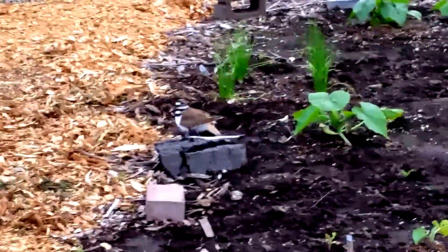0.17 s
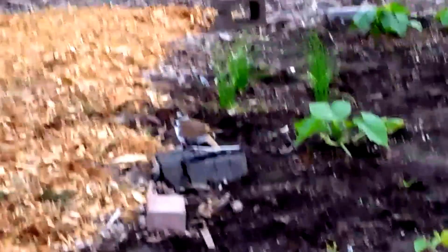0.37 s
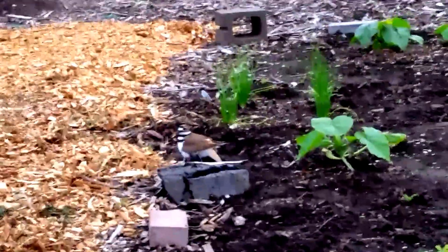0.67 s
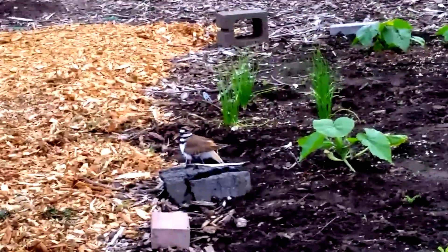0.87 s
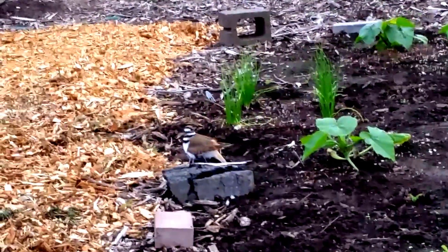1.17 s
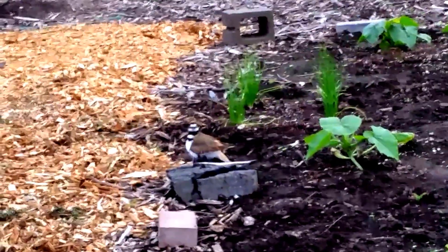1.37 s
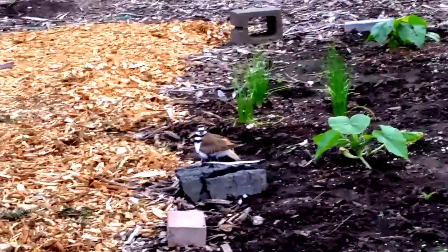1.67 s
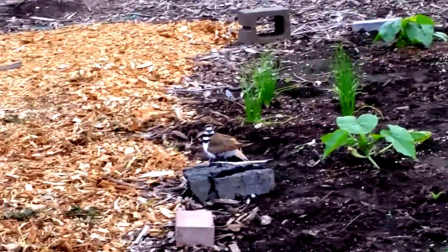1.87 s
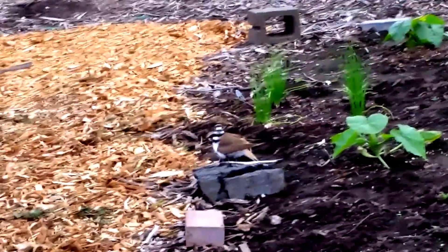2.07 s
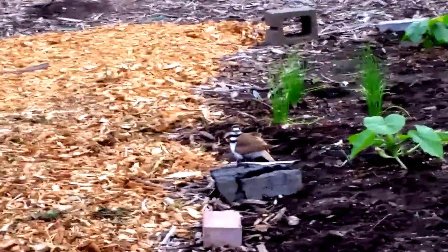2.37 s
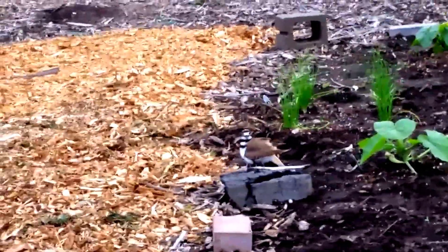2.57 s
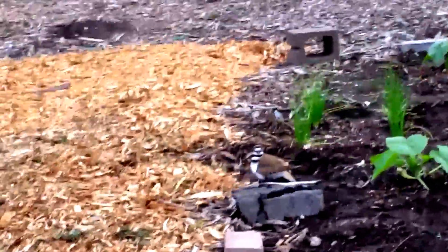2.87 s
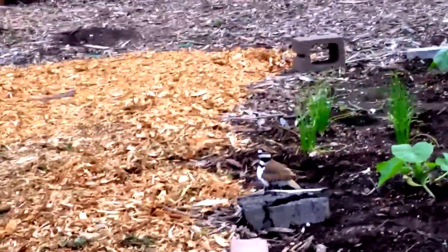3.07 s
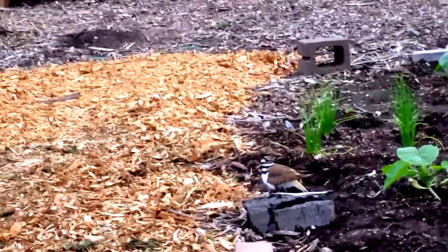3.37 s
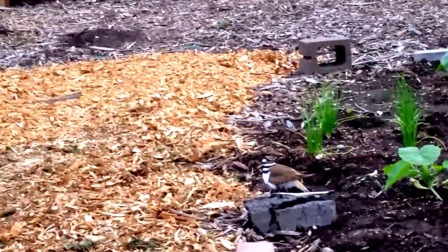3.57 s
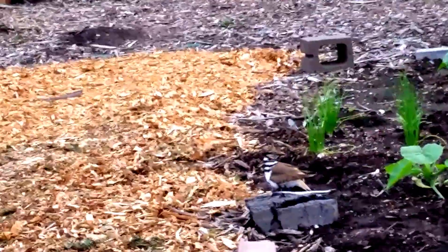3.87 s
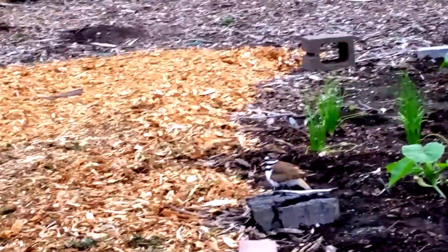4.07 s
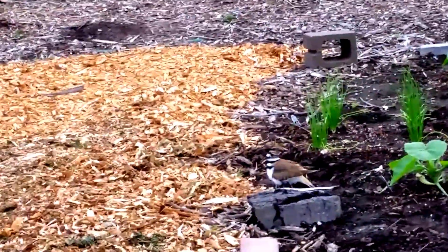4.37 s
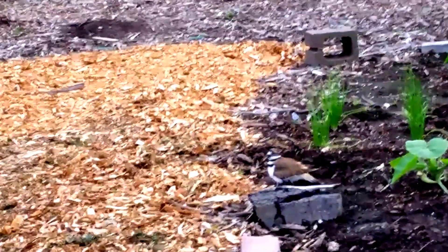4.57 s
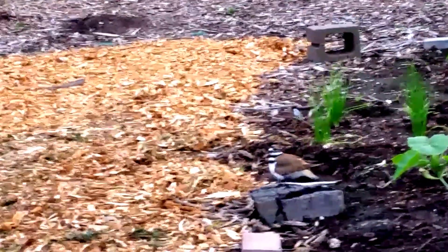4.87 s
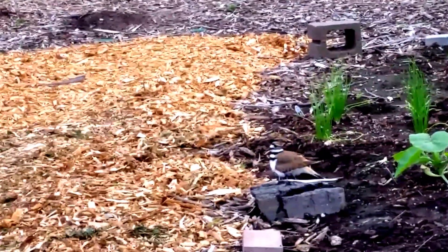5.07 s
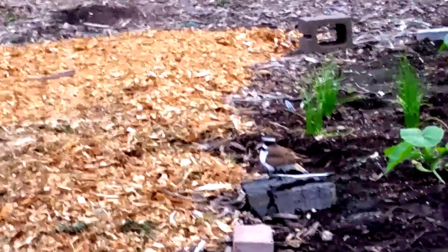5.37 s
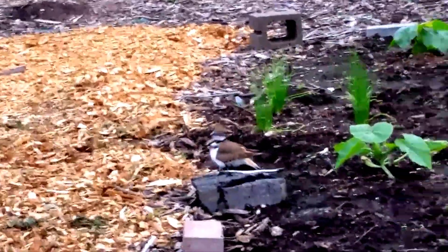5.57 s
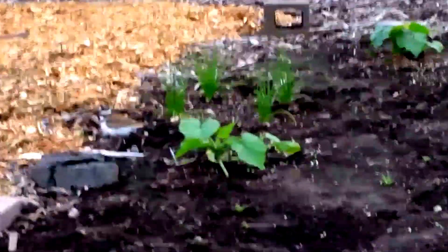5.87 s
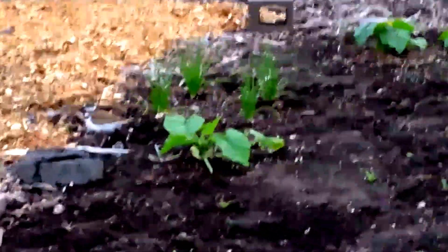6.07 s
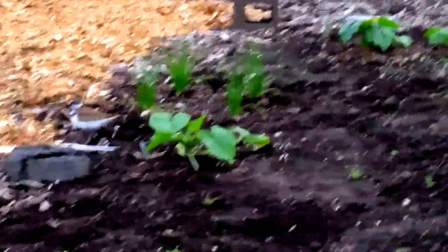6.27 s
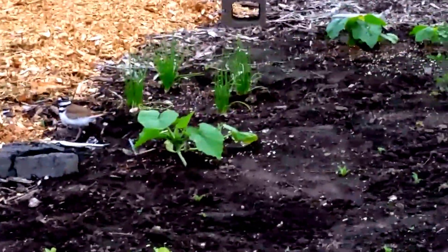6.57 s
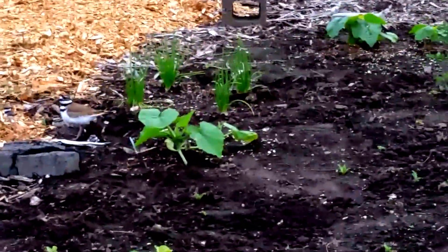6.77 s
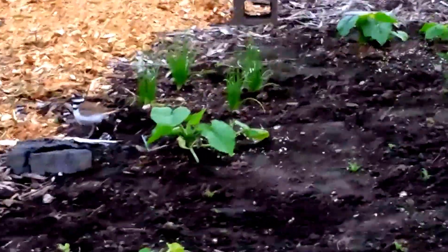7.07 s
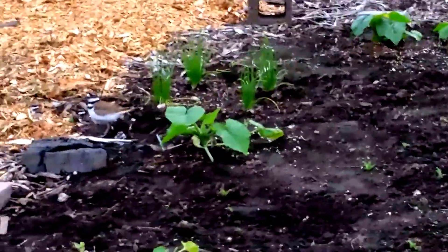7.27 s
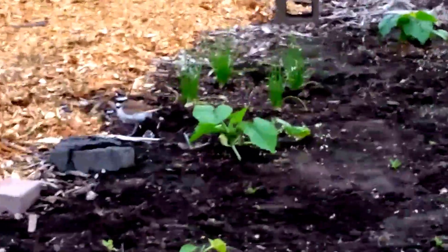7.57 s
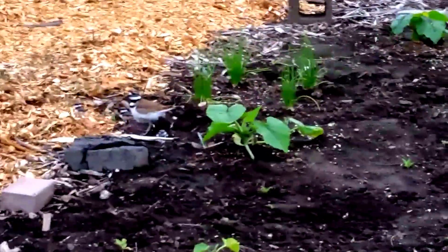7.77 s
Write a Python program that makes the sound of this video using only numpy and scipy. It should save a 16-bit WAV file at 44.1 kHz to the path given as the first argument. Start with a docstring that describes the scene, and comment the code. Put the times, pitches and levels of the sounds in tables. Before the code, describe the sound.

Thin sharp bird peeps repeat over a quiet low outdoor rumble and faint hiss, while fingers thump and rub the microphone case.

```python
"""Killdeer in a garden bed

A killdeer peeps about once a second, a few metres from a hand-held phone: gliding sine partials.
Small birds whistle, chirp and chip further off: sines with decaying noise tails.
Fingers knock (damped pushes into case resonances) and rub (gated noise) on the case, most while it turns.
Under it lie a low outdoor rumble and the left microphone's hiss near 4 kHz: coloured noise."""
import sys
import numpy as np
from scipy import signal
from scipy.fft import rfft, irfft, next_fast_len
from scipy.io import wavfile
from scipy.ndimage import uniform_filter1d

SR = 44100
rng = np.random.default_rng(int(sys.argv[2]) if len(sys.argv) > 2 else 0)


def wav_out(sig):
    """Save sig, one row per channel (or a flat mono array), as 16-bit PCM at SR to the path in sys.argv[1]."""
    wavfile.write(sys.argv[1], SR, np.round(np.clip(np.atleast_2d(sig).T, -1, 1) * 32767).astype(np.int16))


N = 349552
TIME_S = np.arange(N) / SR
FFT_SIZE = next_fast_len(N)
FREQS_HZ = np.maximum(np.arange(FFT_SIZE // 2 + 1) * SR / FFT_SIZE, 1)  # no zero: logs are taken


def undb(db):
    """Decibels to gain."""
    return 10 ** (np.asarray(db) / 20)


def unit(x):
    """Scale to rms 1."""
    return x / np.sqrt(np.mean(x ** 2))


def curves(rows, at):
    """Interpolate every later column of a table along its first."""
    first, *columns = np.transpose(rows)
    return [np.interp(at, np.sort(first), column) for column in columns]


def pan(lr_db):
    """Left and right gains for a level difference, split evenly."""
    return undb(np.array([[.5], [-.5]]) * lr_db)


def add(out, start_s, sound):
    """Mix a sound in at a time."""
    start = int(start_s * SR)
    out[:, start:start + sound.shape[-1]] += sound[..., :N - start]


def fades(t, length_s, rise_s, fall_s):
    """Smooth gate from 0 to length_s."""
    opening = np.sin(np.pi / 2 * np.clip(t / rise_s, 0, 1))
    closing = np.sin(np.pi / 2 * np.clip((length_s - t) / fall_s, 0, 1)) ** 2
    return opening * closing


def shape(x, gain):
    """Weight every frequency of a sound."""
    return irfft(rfft(x, FFT_SIZE) * gain, FFT_SIZE)[..., :N]


def colour(x, points):
    """Filter by (frequency [Hz], level [dB]) points with steep outer skirts, then scale to rms 1."""
    hz, db = np.transpose(points)
    skirt = np.minimum(1, hz.max() / FREQS_HZ) ** 8 * np.minimum(1, FREQS_HZ / hz.min()) ** 4
    curve_db = np.interp(np.log(FREQS_HZ), np.log(np.sort(hz)), db)
    return unit(shape(x, skirt * undb(curve_db)))


def noise(points, channels=1):
    """Unrelated coloured noises."""
    return colour(rng.standard_normal((channels, N)), points)


def smooth(x, size):
    """Two running means round every corner."""
    return uniform_filter1d(uniform_filter1d(x, size), size)


def walk(rate_hz):
    """Smooth random drift, rms 1."""
    hold = max(int(SR / rate_hz), 1)
    steps = np.repeat(rng.standard_normal(N // hold + 1), hold)
    return unit(smooth(steps, hold)[:N])


def resonator(x, hz, width_hz, kind):
    """Two-pole low-, band- or high-pass."""
    g, k = np.tan(np.pi * min(hz / SR, 4 / 9)), width_hz / hz
    top = {"low": g * g * np.poly([-1, -1]),
           "band": g * k * np.poly([1, -1]),
           "high": np.poly([1, 1])}[kind]
    return signal.lfilter(top, [1 + g * k + g * g, 2 * (g * g - 1), 1 - g * k + g * g], x)


def garden(x, wet_db, t60_s=0.43, gap_s=0.011):
    """Soil, plants and walls scatter a faint tail: convolution with decaying noise."""
    t = np.arange(SR) / SR
    tail = rng.standard_normal((2, SR)) * undb(-60 * t / t60_s) * (t > gap_s)
    return x + undb(wet_db) * signal.fftconvolve(x, unit(tail) / np.sqrt(SR), axes=1)[:, :N]


# Background noise level, rising while the phone is moved; only its departure from the median counts:
# (time [s], level [dB])
BACKGROUND_LEVEL = [(0.0, -61.5), (2.7, -63), (3.28, -61), (4.58, -62.5), (6.69, -57), (7.32, -60.5),
                    (7.61, -57), (7.9, -59.5)]
# Outdoor noise spectrum: (frequency [Hz], relative level [dB])
OUTDOORS = [(15, -42.5), (25, -8), (87, 0.5), (124, -4), (146, -10.5), (189, -12), (266, -19), (438, -17),
            (485, -18), (558, -20), (784, -25.5), (884, -24), (1680, -22), (2310, -36), (3000, -42.5),
            (3900, -53.5), (6600, -120)]
# Outdoor noise balance: (frequency [Hz], L-R [dB])
OUTDOORS_LR = [(60, 0.5), (110, 2.5), (200, -2), (380, 14), (700, -4), (1290, 4), (2380, 5), (4400, 4.5),
               (8120, 0.5), (15000, 3)]
# Microphone hiss spectrum: (frequency [Hz], relative level [dB])
HISS = [(1650, -64), (2800, -24.5), (3340, -18.5), (3780, -3), (4310, 1.5), (4680, -1.5), (5170, -6.5),
        (5610, -10), (6120, -26.5), (7200, -56.5), (9360, -74.5), (15800, -120)]
# Treble hiss spectrum: (frequency [Hz], relative level [dB])
TOP_HISS = [(6000, -10.5), (8500, -17.5), (10000, -12.5), (11800, -3), (15500, -2)]
OUTDOORS_DB, HISS_DB, RIGHT_HISS_DB = -49, -50, -24  # right hiss relative to left
# at median background level; bass and middle relative to OUTDOORS_DB
BASS_DB, MIDDLE_DB, TOP_DB = 0.14, 1.5, -79.5
BASS_FOLLOWS, TOP_FOLLOWS = 0.63, 2.3  # dB per dB of background rise


def background(shared_hz=330, own_bass_db=-6):
    """Far rumble is mostly common to both ports, higher air noise is not; the left microphone hisses."""
    level_db = curves(BACKGROUND_LEVEL, TIME_S)[0]
    rise_db = level_db - np.median(level_db)
    bass_db = BASS_DB + BASS_FOLLOWS * rise_db + .9 * walk(12)
    middle_db = MIDDLE_DB + rise_db
    top_db = TOP_DB + TOP_FOLLOWS * rise_db
    bass_share = 1 / (1 + (FREQS_HZ / shared_hz) ** 4)
    ports = pan(curves(OUTDOORS_LR, FREQS_HZ)[0])
    ports = ports / np.sqrt(np.mean(ports ** 2, axis=0))
    shared, own = noise(OUTDOORS), noise(OUTDOORS, channels=2)
    rumble = shape(shared + undb(own_bass_db) * own, ports * np.sqrt(bass_share)) * undb(bass_db)
    air = shape(own, ports * np.sqrt(1 - bass_share)) * undb(middle_db)
    hiss = noise(HISS, channels=2) * undb(HISS_DB + np.array([[0], [RIGHT_HISS_DB]]))
    top_hiss = undb(top_db) * noise(TOP_HISS, channels=2)
    return undb(OUTDOORS_DB) * (rumble + air) + hiss + top_hiss


# Fingers sliding on the case: (time [s], length [s], body rumble [dB], scratch [dB])
RUBS = [(0.302, 0.13, -42.5, -85), (5.334, 0.26, -31, -85), (5.676, 0.052, -30.5, -38.5),
        (5.965, 0.087, -36.5, -38), (6.204, 0.043, -29.5, -42.5), (6.259, 0.08, -37, -43),
        (6.358, 0.03, -48, -39.5), (6.414, 0.032, -38, -42.5), (6.476, 0.083, -37, -41),
        (6.978, 0.027, -33, -36.5), (7.434, 0.045, -30, -65), (7.468, 0.13, -32.5, -42),
        (7.555, 0.079, -36, -30), (7.674, 0.0058, -40, -40), (7.881, 0.0072, -40, -40.5)]
# Rumble spectrum: (frequency [Hz], relative level [dB])
RUB_BODY = [(30, 6.5), (90, 7.5), (200, 0.5), (300, -14.5), (460, -4), (700, -50), (1500, -25), (2600, -42),
            (6000, -52)]
# Scratch spectrum: (frequency [Hz], relative level [dB])
RUB_SCRATCH = [(100, 6), (450, 17), (900, 6.5), (1800, 13), (2800, 1), (4300, 6), (6500, -8.5),
               (10500, -1.5), (15500, -14)]


def rubs(grain_db=5, grip_db=1, body_lr_db=12, leak_hz=1800, leak_db=-2):
    """Skin sticks and slips: the case rumbles most at the left port, the scratch is sharpest at the right."""
    body, scratch = np.zeros((1, N)), np.zeros((1, N))
    for start_s, length_s, body_db, scratch_db in RUBS:
        t = np.arange(int(length_s * SR)) / SR
        pressure = fades(t, length_s, 0.1 * length_s, 0.51 * length_s)
        add(body, start_s, undb(body_db) * pressure)
        add(scratch, start_s, undb(scratch_db) * pressure)
    # slips come in spurts as the grip changes
    spurts_db = grain_db * walk(1500) + grip_db * walk(180)
    slips = rng.standard_normal((2, 2, N)) * undb(spurts_db)
    left, right = scratch * colour(slips[0], RUB_SCRATCH)
    left = undb(leak_db) * resonator(left, leak_hz, 1.6 * leak_hz, "low")
    body_ports = undb(-body_lr_db / 2) * pan(body_lr_db)  # left at 0 dB
    return np.array([left, right]) + body * body_ports * colour(slips[1], RUB_BODY)


# Light taps as the grip shifts:
# (time [s], length [s], left peak [dB], brightness [Hz], hollow ring [dB], rate [taps/s])
FLURRIES = [(0.344, .06, -25, 208, -32, 29.3), (2.308, .1, -34.5, 260, 0, 34),
            (5.410, 0.061, -22, 330, -7, 65), (5.516, .13, -26, 378, 6, 15.5),
            (6.36, .09, -25, 555, 19, 34), (7.104, .12, -30.5, 241, -19, 16.4)]
TAP_SCATTER_DB, TAP_JITTER = 1, 0.0805  # rms strength; rms timing in shares of a gap


def light_taps():
    """Each flurry is a run of unevenly spaced, unevenly strong little knocks."""
    taps = []
    for start_s, length_s, db, bright_hz, ring_db, rate_hz in FLURRIES:
        chance = rng.standard_normal(size=(12, 2))[:round(length_s * rate_hz)]
        for k, (late, hard) in enumerate(chance):
            tap_s = start_s + (k + TAP_JITTER * late * (k > 0)) / rate_hz
            taps.append((tap_s, db + TAP_SCATTER_DB * hard, bright_hz, ring_db))
    return taps


# Finger knocks, peak before the wall filter:
# (time [s], left peak [dB], brightness [Hz], hollow ring [dB])
KNOCKS = [(2.237, -25.5, 213, -20), (2.887, -28.5, 299, 12), (3.207, -14.5, 310, -18),
          (4.021, -27.5, 427, -16), (5.385, -4.5, 292, -16), (5.701, -20.5, 370, -17),
          (5.7278, -4.5, 822, -4), (5.7323, -9, 748, 5), (5.750, -2.5, 470, 0), (5.97, -20.5, 870, 13),
          (6.227, -21, 400, -22), (6.332, -24, 520, 20), (6.486, -26, 598, 16), (6.980, -16, 925, 8),
          (7.484, -17.5, 661.6, -10), (7.495, -19, 456, -11), (7.881, -22.5, 1240, 28)]
# Hollow modes of the phone case: (frequency [Hz], width [Hz], level [dB])
CASE_MODES = [(442, 88, -1.5), (900, 86, -6.5), (1730, 440, -4.5)]
KNOCK_LR_DB, RING_SPREAD = 27.5, 0.23  # L-R at 0 dB ring; L-R dB lost per dB of ring


def knocks(sway_hz=88, sway_width_hz=65, wall_hz=2100):
    """A soft push on the case overshoots and wakes a short hollow ring; the wall passes little treble."""
    out, t = np.zeros((2, N)), np.arange(SR // 8) / SR
    for start_s, db, bright_hz, ring_db in KNOCKS + light_taps():
        contact = 2 * np.pi * bright_hz * t
        push = contact ** 2 * np.exp(-contact)
        ring = sum(undb(mode_db) * resonator(push, hz, width_hz, "band")
                   for hz, width_hz, mode_db in CASE_MODES)
        thump = resonator(push, sway_hz, sway_width_hz, "high") + undb(ring_db) * ring
        lr_db = KNOCK_LR_DB - RING_SPREAD * ring_db
        add(out, start_s, pan(lr_db) * undb(db - lr_db / 2) * thump / np.abs(thump).max())
    return signal.sosfilt(signal.butter(8, wall_hz, fs=SR, output="sos"), out)


# Peeps: (time [s], length [s], held pitch [Hz], crest above it [Hz], sag over the peep [Hz], attack [dB],
# held level [dB], attack L-R [dB], held L-R [dB], odd partials [dB])
PEEPS = [(0.868, .160, 4168, 346, -4, -26, -21.5, 1.5, 4.5, -14.5),
         (1.742, .142, 4084, 334.5, 18, -22.5, -24.5, 1, 1.5, -21),
         (3.025, 0.14, 4058, 295, 346, -22, -23.5, 4, 3.5, -7),
         (3.819, 0.15, 4165, 364, 189, -24.5, -23.5, 5, 2.5, -13),
         (4.596, 0.15, 4155, 418, 52, -24.5, -24, 6.5, 1.5, -16),
         (5.671, 0.164, 4083, -68, 52, -42, -27.5, -1, -8, 2.5),
         (6.592, 0.15, 4083, 343, 73, -26.5, -30.5, -13.5, -9, 2.5),
         (7.275, 0.16, 4086, 299, 98, -32, -32, -26.5, -7, 2)]
# Effort: (share of length, share of attack, swell [dB], share of the peep's odd-partial dB)
PEEP_SHAPE = [(0, 1, -2.5, 0.5), (.09, 1, 1.5, 0.54), (.2, .7, 1, 1.8), (.35, .1, 0, 1.5),
              (.62, 0.1, 0.6, 1.5), (.85, 0.19, -0.1, 1.9), (.94, 0.072, 2.5, 1.2), (1, 0, -2, 1.2)]
# Pitch: (share of length, bend from held pitch [Hz], share of crest)
PEEP_CONTOUR = [(0, 94, .12), (.07, -2, 1), (.13, -92.5, 1.11), (.35, -21, .07), (.55, 4.5, 0),
                (.78, -79, 0.027), (.87, -48, 0), (.97, 123.5, 0.048)]
# Partials before tilt, the second carries the peep: (multiple, attack [dB], held level [dB])
VOICE = [(1, -41.5, -27.5), (2, 1.5, -2), (3, -31.5, -34), (4, -30.5, -32), (5, -46, -41.5),
         (6, -33.5, -48), (7, -52.5, -51)]
OVERTONE_TILT_DB = -1  # per partial above the second


def killdeer(overtone_lr_db=-15, rise_s=.006, fall_s=.008):
    """Each peep leaps to a crest, sags and flicks up; the second partial is by far the strongest."""
    out = np.zeros((2, N))
    waver, flutter_db = .001 * walk(400), .35 * walk(90)
    for (start_s, length_s, held_hz, crest_hz, sag_hz,
         attack_db, held_db, attack_lr_db, held_lr_db, odd_db) in PEEPS:
        t = np.arange(int((length_s + fall_s / 2) * SR)) / SR
        share = t / length_s
        here = int(start_s * SR) + np.arange(len(t))
        attack, swell_db, odd_weight = curves(PEEP_SHAPE, share)
        bend_hz, crest = curves(PEEP_CONTOUR, share)
        glide_hz = held_hz + bend_hz + crest * crest_hz - sag_hz * (share - .55)
        hz = smooth(glide_hz, size=200) * (1 + waver[here])
        phase = 2 * np.pi * np.cumsum(hz / 2) / SR  # of the first partial
        level_db = held_db + (attack_db - held_db) * attack + swell_db + flutter_db[here]
        size = undb(level_db) * fades(t, t[-1], rise_s, fall_s)
        for k, (_, hard_db, soft_db) in enumerate(VOICE, 1):
            db = soft_db + (hard_db - soft_db) * attack
            db = db + odd_db * odd_weight * (k % 2) + OVERTONE_TILT_DB * max(k - 2, 0)
            lr_db = held_lr_db + (attack_lr_db - held_lr_db) * attack if k <= 2 else overtone_lr_db
            add(out, start_s, size * undb(db) * pan(lr_db) * np.sin(k * phase))
    return out


# Far chips: (time [s], level [dB])
CHIPS = [(1.251, -76), (1.50, -79), (1.903, -65), (2.085, -70.5), (2.27, -73), (2.455, -74)]


def chips(top_hz=9150, end_hz=8250, length_s=0.036, voice_gap_hz=420):
    """A run of falling chips, sung with both sides of the syrinx: two parallel glides."""
    out, t = np.zeros((2, N)), np.arange(int(length_s * SR)) / SR
    hz = top_hz + (end_hz - top_hz) * t / length_s
    chip = sum(np.sin(2 * np.pi * np.cumsum(hz + side * voice_gap_hz / 2) / SR) for side in (-1, 1)) / 2
    for start_s, db in CHIPS:
        add(out, start_s, pan(lr_db=-15) * undb(db) * chip * fades(t, t[-1], 0.029, 0.0066))
    return out


def whistle(rows, lr_db, jitter=0.0026, shimmer_db=1.0):
    """A pure, slightly unsteady sine along (time [s], pitch [Hz], level [dB]) rows."""
    start_s, end_s = rows[0][0], rows[-1][0]
    t = np.arange(int((end_s - start_s) * SR)) / SR
    hz, db = curves(rows, start_s + t)
    phase = 2 * np.pi * np.cumsum(hz * (1 + jitter * walk(130)[:len(t)])) / SR
    size = undb(db + shimmer_db * walk(60)[:len(t)]) * fades(t, t[-1], 0.0054, 0.013)
    out = np.zeros((2, N))
    add(out, start_s, pan(lr_db) * size * np.sin(phase))
    return out


# Thin far whistle: (time [s], pitch [Hz], level [dB])
WHISTLE = [(3.372, 7420, -85), (3.43, 7240, -65.5), (3.52, 7380, -55), (3.60, 7380, -51.5),
           (3.70, 7190, -54.5), (3.78, 7140, -53), (3.812, 6880, -53)]
# Fainter, higher whistle: (time [s], pitch [Hz], level [dB])
HIGH_WHISTLE = [(2.96, 8300, -91), (3.2, 8700, -78.5), (3.42, 8510, -81), (3.51, 8500, -86)]
# Quick chirp trailing off on a near-level note: (time [s], pitch [Hz], level [dB])
CHIRP = [(6.748, 4500, -59), (6.763, 5230, -44), (6.779, 4960, -38.5), (6.792, 4500, -50),
         (6.805, 4680, -54), (6.9, 4720, -61)]


def far_birds():
    """Whistles and a chirp; the chips come from further off, blurred by a stronger, shorter tail."""
    nearer = whistle(WHISTLE, lr_db=7.5) + whistle(HIGH_WHISTLE, lr_db=-13) + whistle(CHIRP, lr_db=-16)
    return garden(nearer, wet_db=-12, t60_s=0.57) + garden(chips(), wet_db=-4, t60_s=0.28, gap_s=0.0028)


def scene():
    """Background, handling and birds."""
    return background() + rubs() + knocks() + garden(killdeer(), wet_db=-23.5) + far_birds()


def record(dry, port_hz=4075, port_width_hz=270, top_hz=15850):
    """A resonance of the left port turns the phase near 4 kHz; the phone cuts the top."""
    left = dry[0] - 2 * resonator(dry[0], port_hz, port_width_hz, "band")
    top_cut = signal.ellip(10, .2, 70, top_hz, fs=SR, output="sos")
    return signal.sosfilt(top_cut, np.array([left, dry[1]]))


dry = scene()
out = record(dry)
wav_out(out)
```